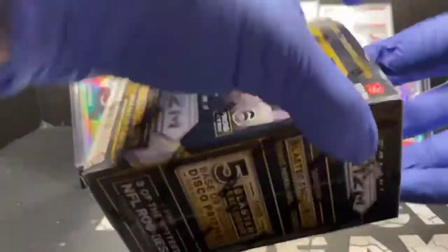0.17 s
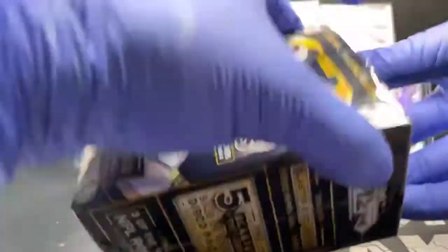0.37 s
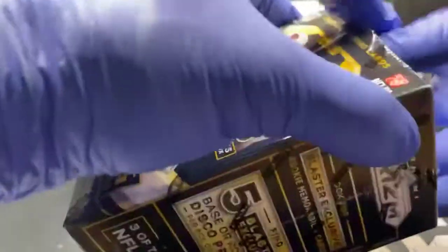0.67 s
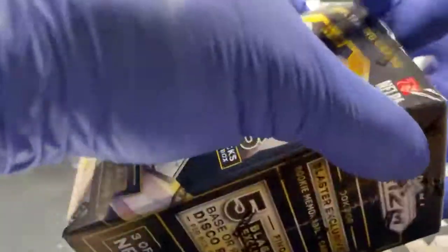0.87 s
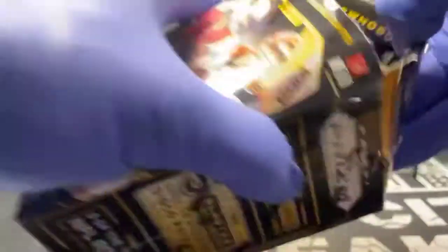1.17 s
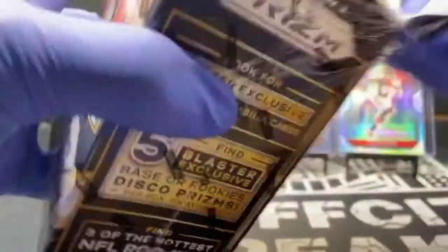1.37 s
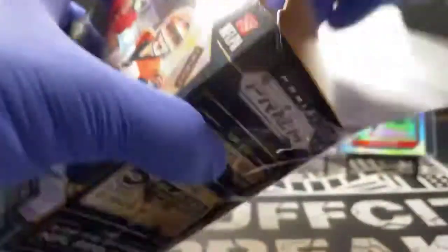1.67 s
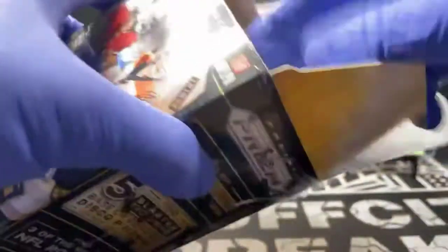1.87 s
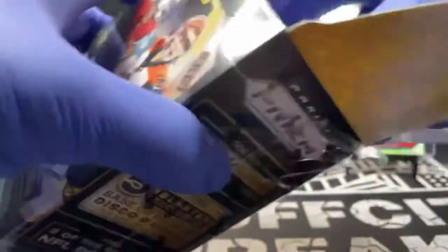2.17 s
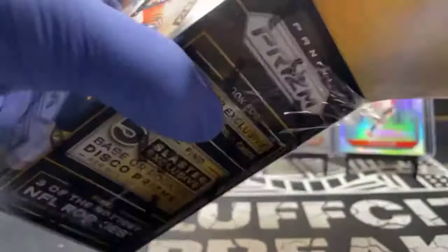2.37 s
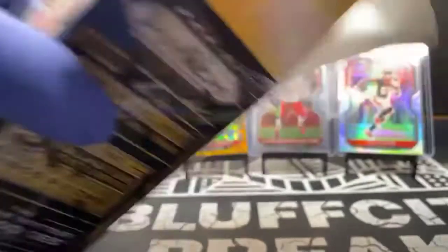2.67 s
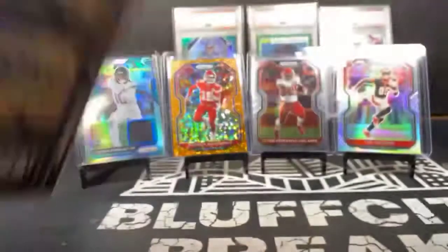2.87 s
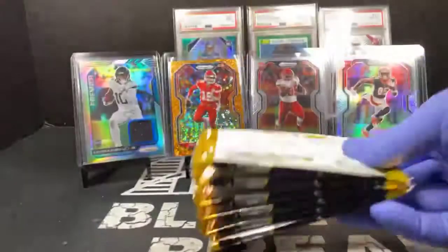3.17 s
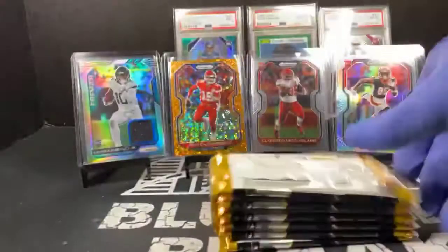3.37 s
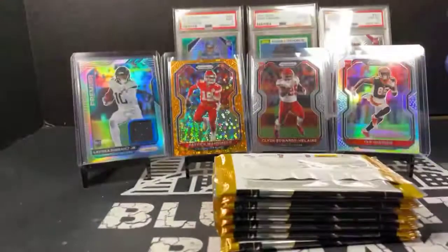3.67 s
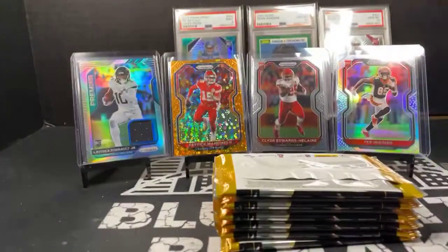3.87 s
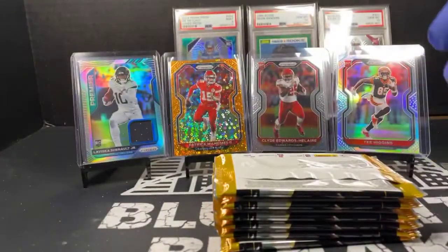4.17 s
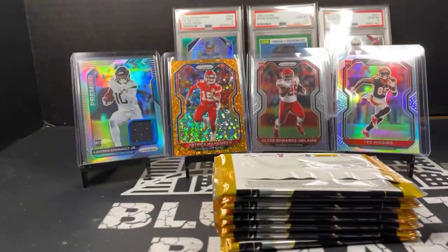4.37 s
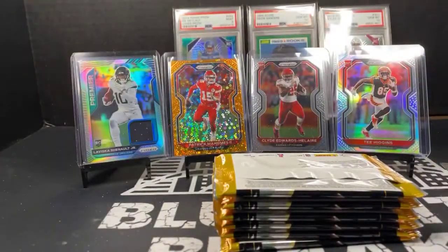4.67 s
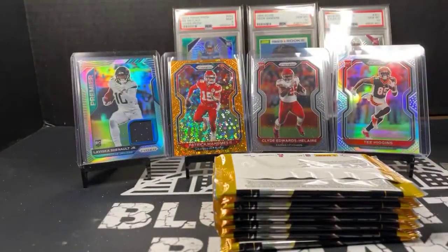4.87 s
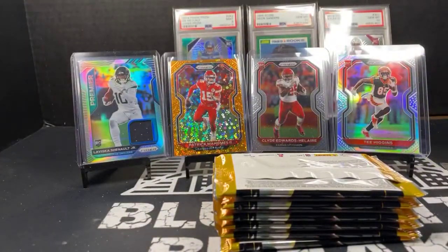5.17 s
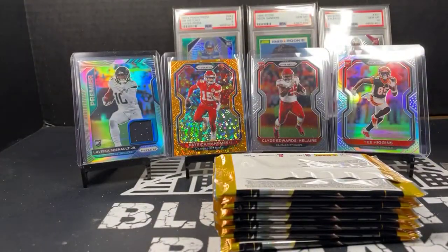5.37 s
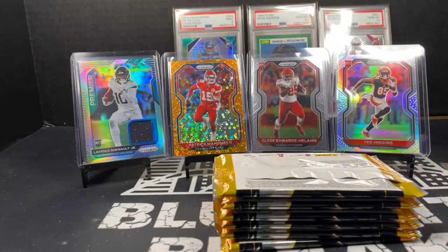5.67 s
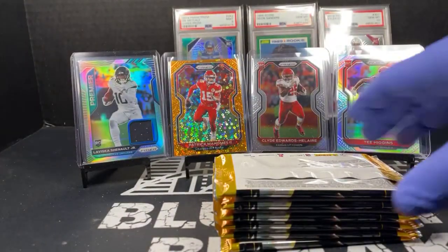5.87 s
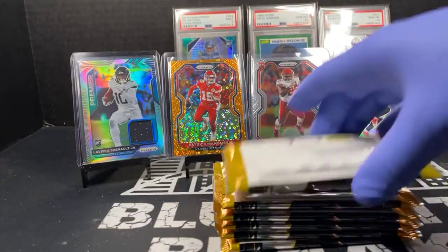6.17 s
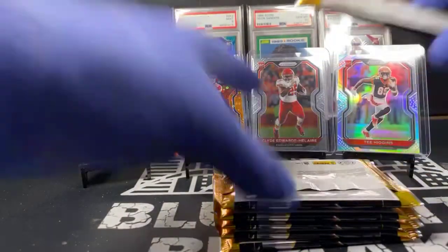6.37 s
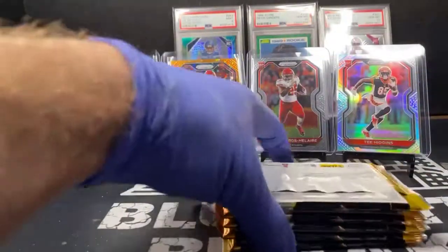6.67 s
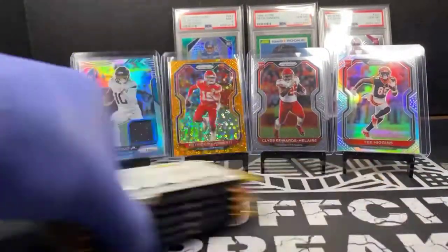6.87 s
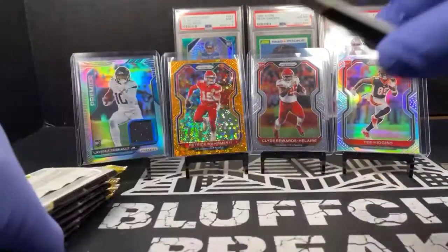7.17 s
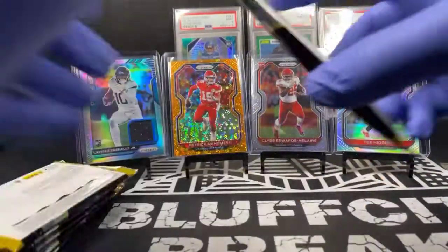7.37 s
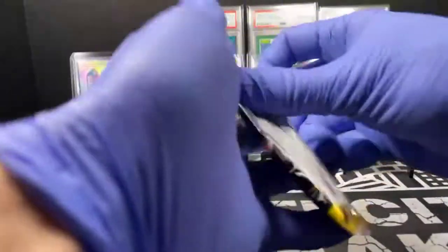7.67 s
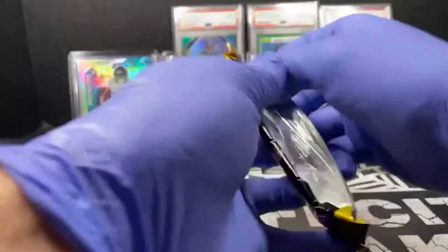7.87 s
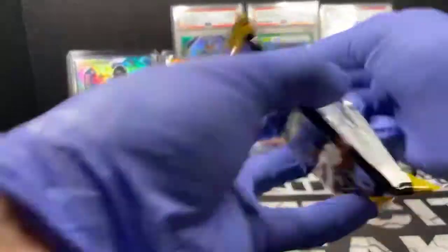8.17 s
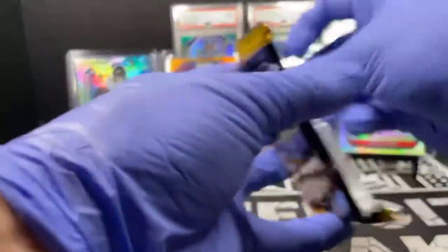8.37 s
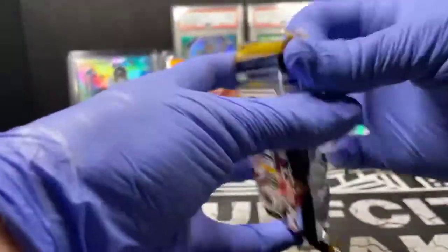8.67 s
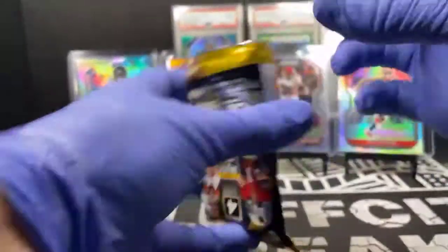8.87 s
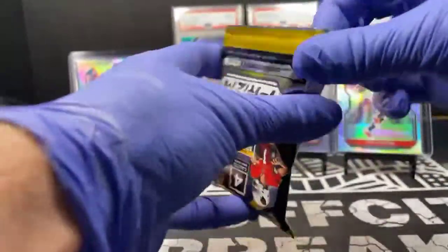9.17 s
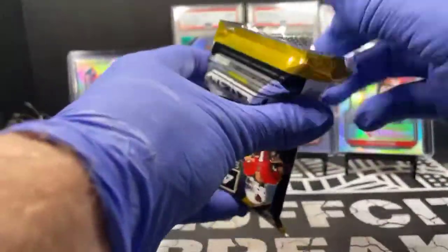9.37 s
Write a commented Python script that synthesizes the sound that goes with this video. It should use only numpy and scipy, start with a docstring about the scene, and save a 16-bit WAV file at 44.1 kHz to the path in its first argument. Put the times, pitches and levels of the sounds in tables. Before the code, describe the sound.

Close by in a small, dry room, gloved hands bump and rustle a small cardboard box, then tear it open with hollow pops, rasps and a brief squeak. A stack of foil packs is set on a table and the box is crushed aside with more scraping and popping. After a short lull, one foil pack is picked up, crinkled and torn open with bright clicks. A faint hiss and hum lie underneath.

```python
"""First come soft bumps and rustling, then pops and rasps: gloved hands tear open a small cardboard box
close by. They set a stack of foil packs on a table, crush the box aside, then pick up one pack, crinkle
it and tear it. Flaps let go and ring the panels, dragged faces squeal by stick-slip friction, and foil
creases buckle with bright clicks. The room is small and dry, with a faint hiss and hum."""
import sys
import numpy as np
from scipy import signal
from scipy.fft import rfft, irfft
from scipy.io import wavfile
from scipy.ndimage import uniform_filter1d

SR = 44100
rng = np.random.default_rng(int(sys.argv[2]) if len(sys.argv) > 2 else 0)


def bounce(signal):
    """Save signal as a 16-bit WAV file at the path given by the first command-line argument."""
    frames = np.transpose(np.atleast_2d(signal))
    limited = np.clip(frames, -1, 1)
    pcm = np.round(limited * 32767).astype(np.int16)
    wavfile.write(sys.argv[1], SR, pcm)


N = 420713

# Spectra of the background, tearing fibres and foil. Each row: frequency in Hz, relative density in dB.
AIR_SPECTRUM = [(25, -17), (43, 4), (64, 5.5), (217, -10), (354, -8), (659, -18), (3720, -23.5),
                (16000, -31)]
FIBRE_SPECTRUM = [(880, -39), (1500, -3), (2640, -9.5), (3090, -7), (3730, -8.5), (5120, -12),
                  (8920, -17.5), (16000, -24)]
FOIL_SPECTRUM = [(880, -21), (1500, -5.5), (3060, -9.5), (3410, -7.5), (5940, -7), (16000, -16.5)]
# Reverberation. Each row: frequency in Hz, time to decay by 60 dB in seconds.
ROOM_DECAY = [(150, 0.59), (500, 0.12), (2000, 0.13), (8000, 0.12)]
# Resonances of the table, the box, a pack of cards, and its foil when sealed and when loose.
# Each row: frequency in Hz, nominal bandwidth in Hz, gain in dB.
TABLE_MODES = [(70.6, 23, -4.5), (110, 27, -1.5), (203, 190, -6)]
BOX_MODES = [(327, 63, -5.5), (556, 78, 0.5), (766, 73, 1), (1126, 94, -3), (1750, 160, -12),
             (2520, 170, -18)]
PACK_MODES = [(397, 380, -4.5), (844, 84, 4.5), (1230, 150, -5), (1840, 49, -5.5), (2680, 36, -12)]
SEALED_FOIL_MODES = [(1310, 130, 7.5), (2700, 140, 3), (3390, 170, 0)]
LOOSE_FOIL_MODES = [(1000, 120, 20.5), (1700, 200, 5), (2410, 170, 0)]
# Table and hollow box. Each row: start in seconds, peak in dB, first pitch in Hz, decay in cycles.
THUMPS = [(0.004, -25, 116, 0.18), (0.286, -21, 110, 0.22), (0.527, -27.5, 213, 1.06),
          (0.778, -25, 223, 0.86), (0.991, -21.5, 190, 1.7), (1.165, -22, 143, 0.6),
          (1.433, -25.5, 110, 0.53), (1.808, -19, 177, 0.53), (1.882, -10.5, 254, 0.92),
          (3.068, -29.5, 128, 0.29), (3.276, -21, 133, 0.44), (3.714, -25, 382, 8.8),
          (3.915, -24.5, 222, 0.72), (4.918, -33, 135, 1.3), (4.964, -31, 157, 3.3),
          (5.307, -22.5, 258, 0.5), (5.548, -31, 181, 2.8), (5.588, -37.5, 172, 5.6),
          (6.419, -37.5, 104.3, 1.9), (6.541, -43.5, 93, 0.95), (7.449, -36, 137, 1.08),
          (8.715, -27.5, 109, 1.4)]
# Rasps. Each row: start and length in seconds, nominal level in dB, first and last pitch in Hz.
SQUEALS = [(1.063, 0.15, -30, 1170, 1110), (1.091, 0.067, -37, 2500, 2694),
           (3.083, 0.045, -41.5, 2700, 2550), (4.043, 0.079, -42.5, 2570, 2360),
           (4.4, 0.047, -43, 2400, 2820), (4.477, 0.095, -41, 784, 823), (6.879, 0.041, -53, 2740, 1820)]
# Squeezes, pulls and slides of the hands. Each row: time of full level, build-up and hold in seconds,
# rustle level in dB, crackle level in dB.
BOX_STROKES = [(0.0, .05, 0, -39, -55.5), (.16, 0.1, 0, -45.5, -59), (.33, 0.24, 0.08, -48.5, -66.5),
               (.539, 0.12, 0.019, -50, -63.5), (.693, 0.069, 0, -44, -55), (.823, 0.036, 0, -34, -48),
               (1.023, 0.11, 0.027, -29, -39.5), (1.177, 0.068, 0.01, -28.5, -27.5),
               (1.342, 0.24, 0, -38.5, -39.5), (1.43, 0.029, 0.061, -47, -54),
               (1.59, 0.04, 0.098, -41.5, -46.5), (1.83, 0.11, 0.12, -39.5, -44.5),
               (2.015, 0.048, 0.065, -42.5, -47), (2.15, 0.3, 0.18, -45.5, -49.5),
               (2.479, 0.04, 0.012, -30, -39.5), (2.61, 0.13, 0.09, -30.5, -38),
               (2.87, 0.085, 0.15, -72.5, -68), (3.11, 0.072, 0.2, -49, -44),
               (3.715, 0.0076, 0.018, -38, -48.5), (3.925, 0.011, 0.066, -37, -53.5),
               (4.081, 0.031, 0, -28, -47), (4.31, 0.31, 0.015, -44, -48.5),
               (4.43, 0.093, 0.062, -37.5, -46.5), (4.978, 0.05, 0, -36, -38),
               (5.17, 0.18, 0.049, -50.5, -55.5), (5.385, 0.24, 0.032, -49.5, -53.5),
               (5.485, 0.014, 0.066, -48, -58.5), (5.592, 0.023, 0.017, -44, -54.5)]
PACK_STROKES = [(5.98, 0.11, 0.084, -75.5, -74.5), (6.42, 0.038, 0.019, -64.5, -64.5),
                (6.53, 0.038, 0.0016, -54.5, -58.5), (6.62, 0.078, 0.054, -59, -52),
                (6.89, 0.14, 0.033, -59, -55), (7.13, 0.35, 0.058, -65, -61.5),
                (7.353, 0.11, 0.012, -70.5, -64.5), (7.458, 0.032, 0, -43.5, -37),
                (7.55, 0.019, 0.0068, -48, -48.5), (7.648, 0.049, 0.011, -42, -32.5),
                (7.8, 0.043, 0.12, -52, -44.5), (8.043, 0.021, 0.0093, -28, -20),
                (8.2, 0.011, 0.2, -48.5, -47), (8.551, 0.1, .12, -41.5, -34),
                (8.76, 0.14, 0.19, -56.5, -54.5), (9.029, 0.019, 0, -38, -33), (9.1, .1, 0.036, -53.5, -44),
                (9.274, 0.15, 0.016, -50, -49), (9.42, .1, 0.1, -79.5, -64.5)]
# Cardboard letting go. Each row: time in seconds, body peak in dB, panel pitch in Hz,
# crack in dB relative to the body, time constant of the slip in seconds.
CARDBOARD_POPS = [(0.331, -19.5, 590, -16, 0.0016), (0.527, -27.5, 630, -17, 0.0013),
                  (0.679, -35, 580, -1, 0.00085), (0.781, -16, 644, -23.5, 0.0023),
                  (0.821, -8, 1010, -7, 0.0011), (0.913, -16, 855, 1.5, 0.0016),
                  (0.994, -18, 550, -8, 0.0034), (1.005, -18, 545, -30, 0.0081),
                  (1.034, -9, 840, 0, 0.0016), (1.042, -7.5, 577.4, -13, 0.00078),
                  (1.166, -13, 545, 2.5, 0.0021), (1.332, -23.5, 960, 4.5, 0.0028),
                  (1.565, -23.5, 850, -6, 0.0045), (1.651, -19.5, 1058, -25, 0.0017),
                  (1.809, -17, 280, -20, 0.0055), (1.821, -17, 1040, -8, 0.0027),
                  (1.883, -6, 593, -24.5, 0.0019), (2.124, -17.5, 630, -42, 0.003),
                  (2.163, -25, 970, -6.5, 0.0042), (2.405, -21, 900, -13, 0.0015),
                  (2.456, -22, 1060, -9, 0.0028), (2.479, -21.5, 870, -4, 0.0079),
                  (2.623, -15.5, 660, -5, 0.0058), (2.641, -18.5, 510, 1.5, 0.0013),
                  (2.678, -15.5, 680, -7.5, 0.0029), (3.068, -25.5, 905, -12.5, 0.00077),
                  (3.238, -27.5, 1030, 3, 0.0031), (3.709, -18.5, 647, -5, 0.001),
                  (3.898, -41.5, 914, -12, 0.002), (3.911, -21.5, 823, -11.5, 0.0034),
                  (4.051, -25, 1320, -7, 0.011), (4.084, -19.5, 845, -13, 0.0046),
                  (4.235, -30, 520, -10, 0.0014), (4.294, -27, 580, -20, 0.0023),
                  (4.33, -31.5, 890, -20, 0.0033), (4.403, -29.5, 880, -10, 0.0044),
                  (4.445, -24.5, 1090, -33, 0.0042), (4.482, -28.5, 730, -1, 0.0075),
                  (5.174, -30, 530, -30, 0.0036), (5.303, -25, 304, -34, 0.0019),
                  (5.547, -26, 465, -38, 0.0028), ]
# Creases flipping. Each row: time in seconds, click peak in dB, body in dB relative to it, pitch in Hz.
FOIL_SNAPS = [(0.695, -37.5, 2, 5240), (0.7628, -42, 10.5, 1990), (0.977, -37, -8, 6000),
              (1.1676, -6.5, -3, 3570), (1.1914, -8.5, -10, 4500), (1.4798, -29.5, -5, 3450),
              (1.608, -43, 5, 5960), (2.2592, -27.5, -4, 1760), (2.308, -27, -3.5, 4440),
              (2.361, -41, -19, 7000), (2.442, -33, -20, 6000), (2.619, -22.5, -1, 4500),
              (2.729, -16.5, -19, 6300), (2.8652, -33.5, -25, 4920), (2.9306, -34, -15, 3680),
              (2.9787, -29, -15, 1780), (3.156, -27, 0.5, 2380), (3.219, -24.5, -5, 2100),
              (3.2815, -25.5, 4.5, 2780), (3.327, -30, -14, 6750), (3.3477, -34.5, 4, 2100),
              (3.3976, -38, -2.5, 3460), (3.441, -50, 4, 1490), (3.7512, -26.5, -13, 2510),
              (5.09, -37.5, -15, 3930), (5.969, -55, 11.5, 1815), (6.0351, -42, -9, 2910),
              (6.6323, -30, -15, 1440), (6.9195, -39, -8, 1500), (6.963, -33.5, -6, 3140),
              (7.037, -43, -16, 3100), (7.069, -37.5, -3, 1370), (7.145, -43, -4.5, 1500),
              (7.3332, -31, -32, 5940), (7.4252, -29, -12, 4870), (7.449, -13, -10, 6950),
              (7.624, -12, -4, 3370), (7.653, -19, -14, 2630), (7.669, -17, -27, 2600),
              (7.6932, -18.5, -10, 2840), (7.704, -23.5, -4, 1400), (7.7422, -24, -4.5, 1490),
              (7.7616, -24, -19, 7000), (7.775, -30, -17, 2700), (7.785, -33, -24, 3500),
              (7.823, -27, -8, 7900), (7.8513, -22.5, -20, 2870), (7.8633, -23.5, -27, 2850),
              (7.9813, -31.5, 2, 2720), (8.024, -19.5, -8, 8100), (8.0441, -15.5, -5, 6130),
              (8.09, -17.5, -1, 2670), (8.171, -20, -3, 2700), (8.2305, -28.5, -6, 8500),
              (8.246, -23, -11, 2680), (8.308, -28.5, -14, 4540), (8.3635, -30.5, 0, 1700),
              (8.453, -26.5, -27, 8050), (8.476, -27, -14, 1830), (8.518, -22, -6, 1760),
              (8.568, -15.5, -12, 1730), (8.639, -17, -4, 1740), (8.667, -19.5, 3.5, 2700),
              (8.7367, -29.5, 3, 1770), (8.781, -22, -18, 3220), (8.8192, -29, 2.5, 1820),
              (8.858, -28, -1.5, 2480), (8.988, -42, 9, 1690), (9.009, -26, -8, 6000),
              (9.018, -20.5, -2, 1740), (9.076, -26.5, 2.5, 1820), (9.1056, -18, -32, 4370),
              (9.121, -27, -8, 1850), (9.1353, -30, -0.5, 1760), (9.173, -25, 2.5, 1720),
              (9.199, -29, -17, 4700), (9.2552, -20.5, 2.5, 1820), (9.3556, -27, -13, 4300),
              (9.3815, -32, -24, 1740)]

BUILD_DB, RUSTLE_FALL_DB_PER_S, CRACKLE_FALL_DB_PER_S = 20, 254, 243  # rise and release of a stroke
SEAM_LOOSE_S = 8.42  # the foil rings at other pitches from here on
AIR_DB, ROOM_DB = -71, -12.5


def amp(db):
    """Amplitude ratio of a level in decibels."""
    return 10 ** (np.asarray(db) / 20)


def unit_rms(x):
    """Normalisation to rms 1."""
    return x / np.sqrt(np.mean(x ** 2) + 1e-20)


def unit_peak(x):
    """Normalisation to peak 1."""
    return x / (abs(x).max() + 1e-12)


def curve_at(points, hz):
    """Interpolation on a logarithmic frequency axis."""
    f, value = np.transpose(points)
    return np.interp(np.log(hz + 1), np.log(f + 1), value)


def add(mix, s, sound):
    """Superposition: a sound joins the mix at s seconds."""
    part = mix[max(round(s * SR), 0):][:len(sound)]
    part += sound[:len(part)]


def ring(x, modes, widen=0.81):
    """Modal response: a sum of damped resonances with alternating signs."""
    out = np.zeros(len(x))
    for k, (hz, width, db) in enumerate(modes):
        r = np.exp(-np.pi * width * widen / SR)
        poles = [1, -2 * r * np.cos(2 * np.pi * hz / SR), r * r]
        out += (-1) ** k * amp(db) * (1 - r) * signal.lfilter([1, 0, -1], poles, x)
    return out


def with_modes(x, modes, share):
    """Parallel resonance: the direct sound plus the ring it excites."""
    return x + share * sum(ring(x, [mode]) for mode in modes)


def impulse_response(spectrum):
    """The causal, minimum-phase response that has a given spectrum."""
    db = curve_at(spectrum, abs(np.fft.fftfreq(2048, 1 / SR)))
    log_gain = np.log(amp(np.maximum(db, -100)))
    return np.fft.ifft(np.exp(np.conj(signal.hilbert(log_gain)))).real[:512]


def burst(noise, slip_s):
    """Transient excitation: noise swells and dies; the longer the slip, the softer its start."""
    u = np.arange(len(noise)) / SR / max(slip_s, .0003)
    return noise * u ** 1.34 * np.exp(-u)


def air():
    """Stationary shaped noise: a faint hiss and hum."""
    gain = amp(curve_at(AIR_SPECTRUM, np.fft.rfftfreq(N, 1 / SR)))
    return amp(AIR_DB) * unit_rms(irfft(rfft(rng.standard_normal(N)) * gain, N))


def room(x):
    """Reverberation: sparse reflections of random sign, each band decaying at its own rate."""
    taps = np.zeros(SR // 2)
    slots = np.arange(200, len(taps) - 20, 20)
    taps[slots + rng.integers(0, 20, len(slots))] = rng.choice([-1., 1.], len(slots))
    hz, t, bands = signal.stft(taps, SR, nperseg=256)
    decay = amp(-60 * t / curve_at(ROOM_DECAY, hz)[:, None])
    tail = signal.istft(bands * decay, SR, nperseg=256)[1]
    return signal.oaconvolve(x, tail / np.linalg.norm(tail))[:N]


def thumps(swell_cycles=0.75, sag_per_s=3.8):
    """Damped oscillation: a soft push on table or box starts a low note that swells, sinks and stops."""
    out, t = np.zeros(N), np.arange(6000) / SR
    for s, db, hz, cycles in THUMPS:
        tone = np.sin(2 * np.pi * hz * t / (1 + sag_per_s * t / max(cycles, 1)))
        swell = 1 - np.exp(-t * hz / swell_cycles)
        decay = np.exp(-(t * hz / max(cycles, .3)) ** 1.4)
        add(out, s, amp(db) * unit_peak(tone * swell * decay))
    return out


def squeals(relative_width=0.1, grit_db=2):
    """Stick-slip friction: uneven slips drive one narrow resonance whose pitch slides with the grip."""
    out, noise = np.zeros(N), rng.standard_normal((len(SQUEALS), 2, 8000))
    for (s, length_s, db, first_hz, last_hz), (drive, grit) in zip(SQUEALS, noise):
        progress = np.minimum(np.arange(len(drive)) / SR / length_s, 1)
        carrier = np.exp(2j * np.pi * np.cumsum(first_hz + (last_hz - first_hz) * progress) / SR)
        r = np.exp(-np.pi * relative_width * first_hz / SR)
        slips = drive * amp(grit_db * unit_rms(uniform_filter1d(grit, 60)))
        tone = (carrier * signal.lfilter([1 - r], [1, -r], slips / carrier)).real
        add(out, s, amp(db) * unit_rms(tone) * np.sqrt(np.sin(np.pi * progress).clip(0)))
    return out


def ruptures(per_s, spread_db, clump_db, clump_s, tail_s, hiss):
    """Shot noise: tiny ruptures of uneven size over a fine hiss, swelling in random clumps."""
    span = int(clump_s * SR)
    clumps = unit_rms(uniform_filter1d(uniform_filter1d(rng.standard_normal(N), span), span))
    sizes = amp(spread_db * np.minimum(rng.exponential(1, N), 4))
    impulses = sizes * (rng.random(N) < per_s / SR)
    bursts = signal.lfilter([1], [1, -np.exp(-1 / (tail_s * SR))], impulses)
    return amp(clump_db * clumps) * (unit_rms(bursts) + hiss) * rng.standard_normal(N)


def patchy(x, patch_db):
    """Spectral modulation: each crease has its own colour, a random gain over time and frequency."""
    bands = signal.stft(x, nperseg=256, noverlap=192)[2]
    patches = uniform_filter1d(rng.standard_normal(bands.shape[::-1]), 11, axis=0)
    patches = unit_rms(uniform_filter1d(patches, 3, axis=1))
    return signal.istft(bands * amp(patch_db * patches.T), nperseg=256, noverlap=192)[1][:N]


def stroke_envelope(strokes, level_index, fall_db_per_s):
    """Incoherent addition: each stroke builds, holds and dies away, and their powers add."""
    t, power = np.arange(0, N / SR + .01, .002), 1e-14
    for top_s, build_s, hold_s, *levels in strokes:
        rise_db = BUILD_DB * np.maximum(top_s - t, 0) / max(build_s, .005)
        fall_db = fall_db_per_s * np.maximum(t - top_s - hold_s, 0)
        power = power + amp(levels[level_index] - rise_db - fall_db) ** 2
    return np.interp(np.arange(N) / SR, t, np.sqrt(power))


def handling(strokes, modes, spectrum, rub, crease, table_db, foil_share, patch_db):
    """Forced vibration: rubbing rings the walls and shakes the table; creasing crackles in the treble."""
    walls = unit_rms(patchy(ring(rub, modes, widen=1.4), patch_db=4.5))
    table = unit_rms(ring(ring(rub, TABLE_MODES), TABLE_MODES, widen=3.6))
    rustle = stroke_envelope(strokes, 0, RUSTLE_FALL_DB_PER_S) * (walls + amp(table_db) * table)
    treble = signal.oaconvolve(crease, impulse_response(spectrum))[:N]
    sealed = with_modes(treble, SEALED_FOIL_MODES, foil_share)
    loose = with_modes(treble, LOOSE_FOIL_MODES, foil_share)
    crackle = unit_rms(patchy(np.where(np.arange(N) < SEAM_LOOSE_S * SR, sealed, loose), patch_db))
    return rustle + stroke_envelope(strokes, 1, CRACKLE_FALL_DB_PER_S) * crackle


def box_rustle():
    """Sliding friction: cardboard rubs with a smooth hiss while its fibres break."""
    rub = ruptures(per_s=560, spread_db=1.5, clump_db=2.2, clump_s=0.022, tail_s=0.0017, hiss=0.6)
    crease = ruptures(per_s=1500, spread_db=3.5, clump_db=1, clump_s=0.0091, tail_s=0.00063, hiss=2.2)
    return handling(BOX_STROKES, BOX_MODES, FIBRE_SPECTRUM, rub, crease,
                    table_db=-7, foil_share=0.1, patch_db=2.6)


def pack_crinkle():
    """Crumpling: sparser, more uneven impulses excite the pack and its foil."""
    rub = ruptures(per_s=700, spread_db=3.03, clump_db=2.2, clump_s=0.01, tail_s=0.0014, hiss=0.4)
    crease = ruptures(per_s=600, spread_db=3.8, clump_db=1.4, clump_s=0.0044, tail_s=0.001, hiss=1)
    return handling(PACK_STROKES, PACK_MODES, FOIL_SPECTRUM, rub, crease,
                    table_db=-9, foil_share=1, patch_db=3.5)


def facets(x):
    """Local resonance: small facets near a break ring briefly, at new pitches each time."""
    return with_modes(x, [(hz, 0.06 * hz, 8) for hz in 2000 * 6.5 ** rng.random(size=4)], share=0.82)


def cardboard_pops():
    """Release of elastic strain: a glued flap or panel lets go; panel and box ring as fibres crack."""
    out, fibres = np.zeros(N), impulse_response(FIBRE_SPECTRUM)
    noise = rng.standard_normal((len(CARDBOARD_POPS), 2, 5000))
    for (s, db, hz, crack_db, slip_s), (push, tear) in zip(CARDBOARD_POPS, noise):
        drive = burst(push, slip_s)
        panel = ring(ring(drive, [(hz, 0.43 * hz, 0)]), [(hz, .5 * hz, 9)])  # twice, for a hollow ring
        body = unit_peak(panel + amp(-1) * ring(drive, BOX_MODES, widen=1.7))
        crack = np.convolve(burst(tear, 0.8 * slip_s), fibres)[:len(tear)]
        add(out, s - .0015, amp(db) * (body + amp(crack_db) * unit_peak(facets(crack))))
    return out


def foil_snaps():
    """Snap-through buckling: a crease flips with a bright, pitched click and the pack of cards answers."""
    out, foil = np.zeros(N), impulse_response(FOIL_SPECTRUM)
    noise = rng.standard_normal((len(FOIL_SNAPS), 2, 4000))
    creases = rng.random((len(FOIL_SNAPS), 1 + len(PACK_MODES)))
    for (s, db, body_db, hz), (flip, push), (slowness, *grip) in zip(FOIL_SNAPS, noise, creases):
        slip_s = 0.0011 * 2.2 ** slowness
        drive = burst(flip, 0.55 * slip_s) + 0.12 * burst(flip, 3.4 * slip_s)
        click = np.convolve(drive, foil)[:len(flip)]
        pole = np.exp(-2 * np.pi * 1.9 * hz / SR)  # duller above 1.9 times the crease pitch
        click = facets(signal.lfilter([1], [1, -pole], click))
        sheet = SEALED_FOIL_MODES if s < SEAM_LOOSE_S else LOOSE_FOIL_MODES
        click = unit_peak(with_modes(click, sheet + [(hz, 0.1 * hz, 10)], share=0.91))
        # the fingers weaken different modes each time
        held = [(f, width, gain_db - 14 * g) for (f, width, gain_db), g in zip(PACK_MODES, grip)]
        body = unit_peak(ring(burst(push, 0.9 * slip_s), held, widen=2.7))
        add(out, s - .001, amp(db) * (click + amp(body_db) * body))
    return out


def scene():
    """Superposition in mono: box and packs close by, their reflections, the thumps and the air."""
    direct = box_rustle() + pack_crinkle() + cardboard_pops() + foil_snaps() + squeals()
    return (direct + amp(ROOM_DB) * room(direct) + thumps() + air())[None]


def record(dry):
    """Band limiting: a bass cut at 55 Hz, then a steep treble cut at 15.9 kHz."""
    bass_cut = signal.butter(3, 55, "high", fs=SR, output="sos")
    treble_cut = signal.firwin(511, 15900, window=("kaiser", 9), fs=SR)
    return signal.oaconvolve(signal.sosfilt(bass_cut, dry), treble_cut[None], "same")


dry = scene()
out = record(dry)
bounce(out)
```